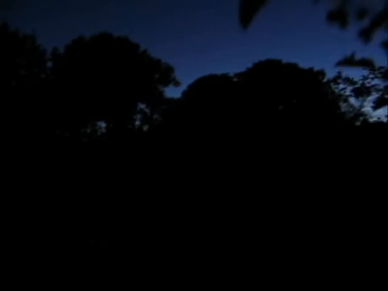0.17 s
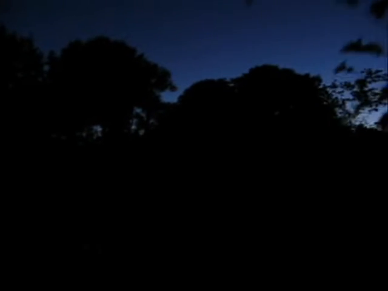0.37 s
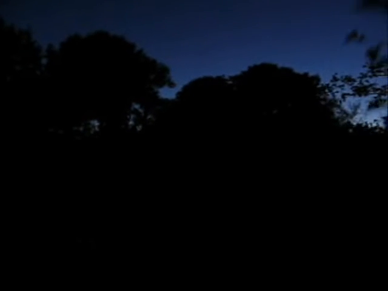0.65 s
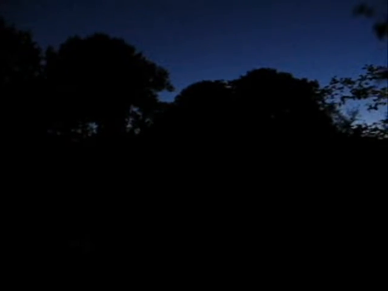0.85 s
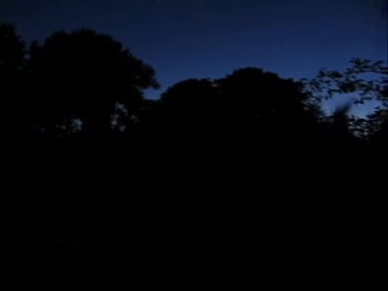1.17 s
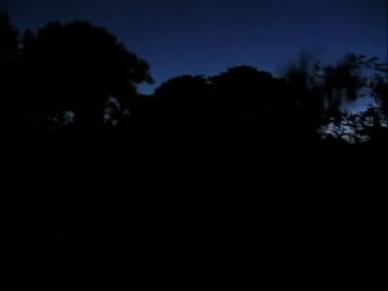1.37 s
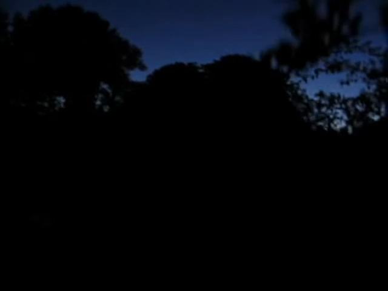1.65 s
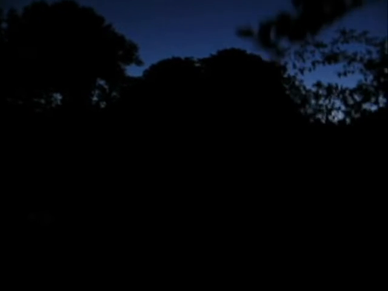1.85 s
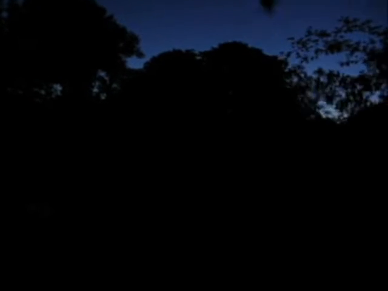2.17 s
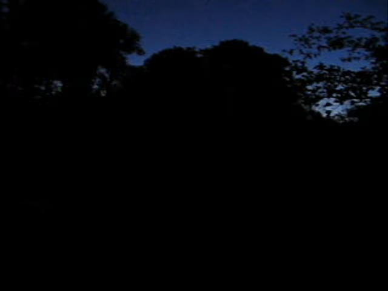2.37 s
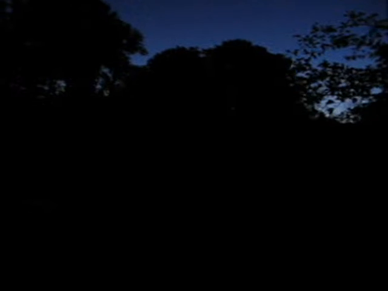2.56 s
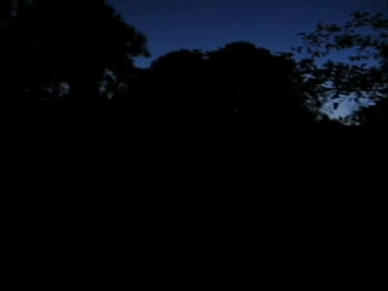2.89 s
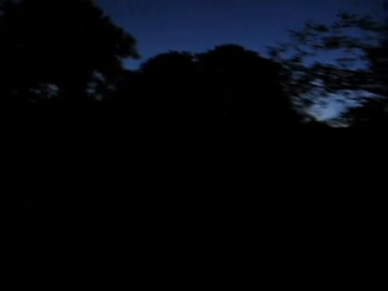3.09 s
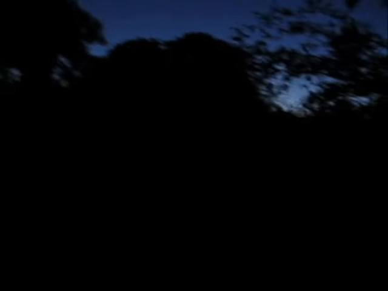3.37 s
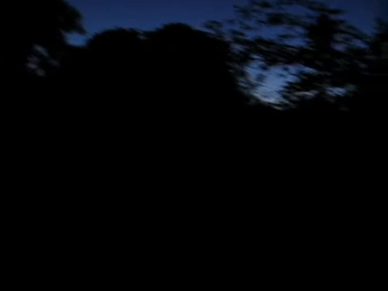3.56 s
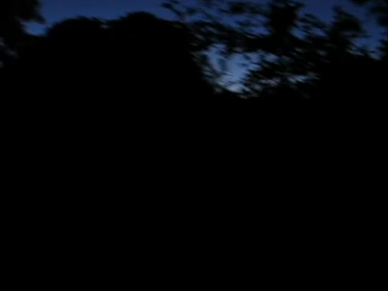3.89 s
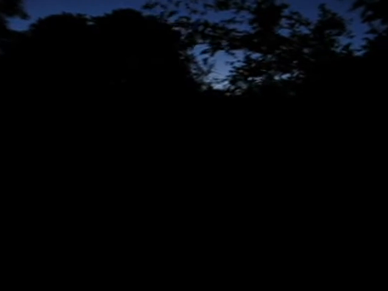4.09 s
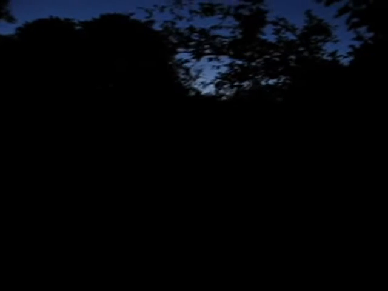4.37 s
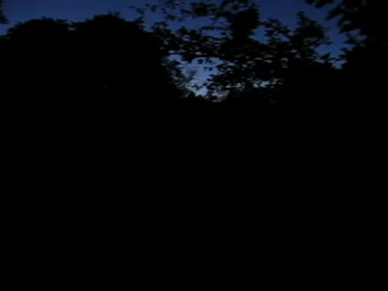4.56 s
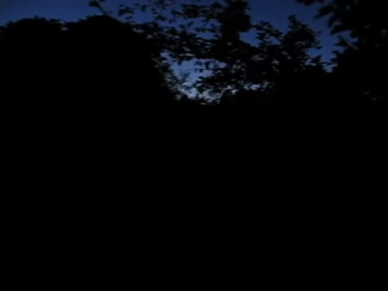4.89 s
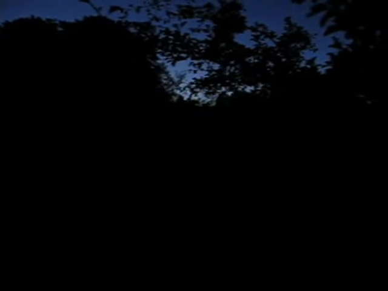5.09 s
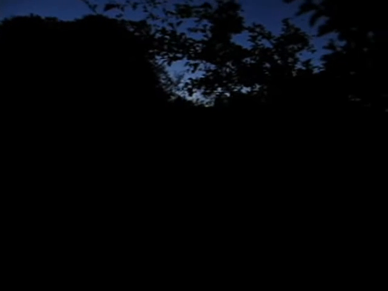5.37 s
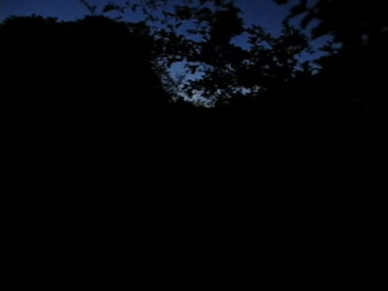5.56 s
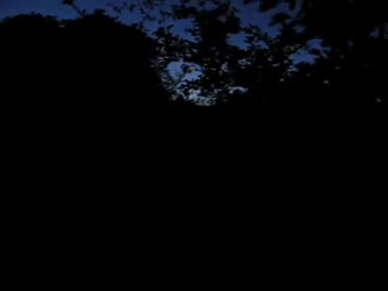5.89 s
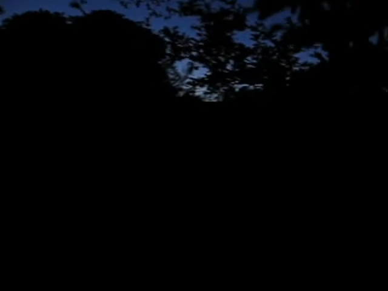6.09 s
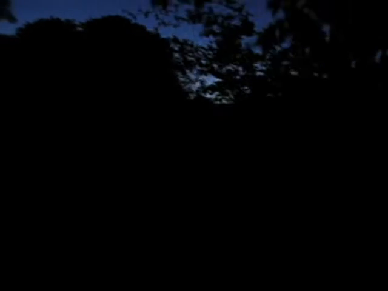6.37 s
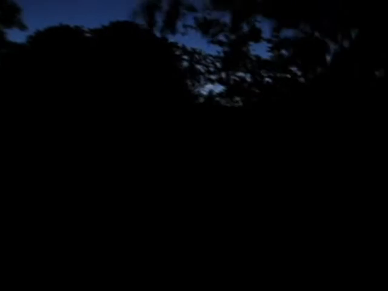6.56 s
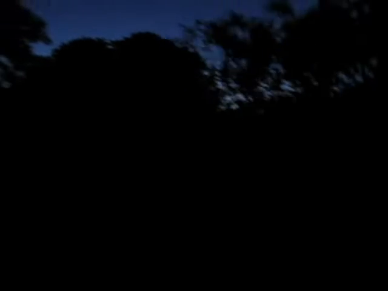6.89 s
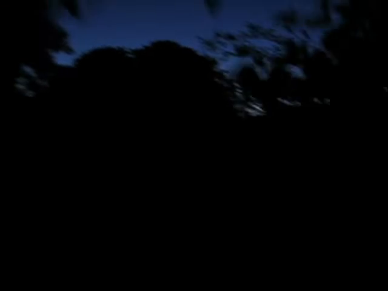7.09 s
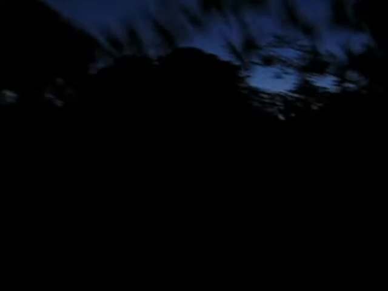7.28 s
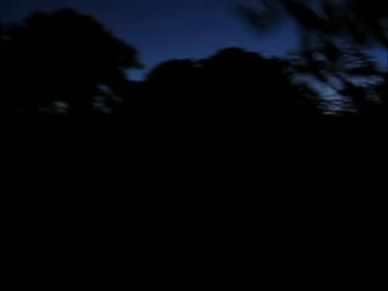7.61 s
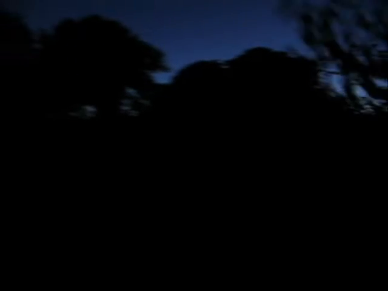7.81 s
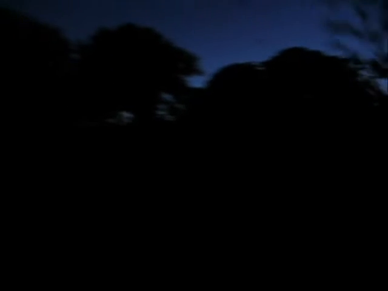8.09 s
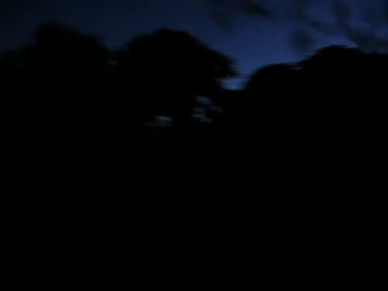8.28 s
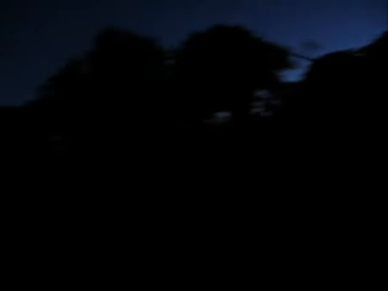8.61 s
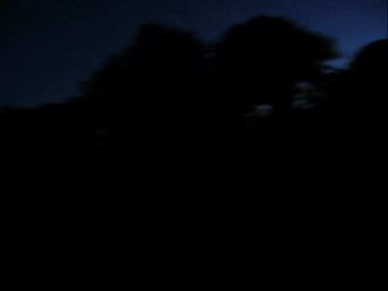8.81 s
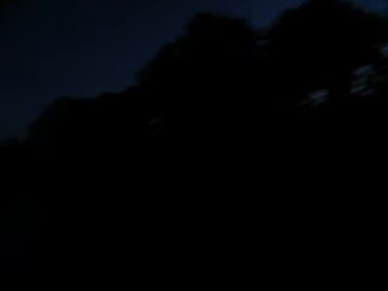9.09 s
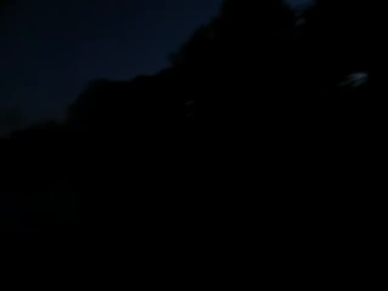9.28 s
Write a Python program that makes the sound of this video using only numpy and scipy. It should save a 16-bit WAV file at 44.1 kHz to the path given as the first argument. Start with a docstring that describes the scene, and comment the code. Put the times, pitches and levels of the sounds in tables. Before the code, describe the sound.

At a dark pond edge with trees, many male tree frogs call at once. Near frogs give short swelling rattles, about ten a second and overlapping, over a continuous throbbing crowd of farther ones. Slight echoes return from water and banks. A small, cheap camera microphone adds hiss, a gritty treble edge, and soft wind rumble with a stronger thump midway. Late on, one lower, louder caller repeats quickly as the crowd thins.

```python
"""A pond at dusk: many male tree frogs rattle together, near callers over a throbbing crowd.
Each call is a short swelling train of pulses; every pulse excites the vocal sac at two main pitches.
Water and banks return short echoes. Wind rumbles and pops on the ports of a small camera microphone,
over hiss and faint whines. Its coarse converter holds each sample, so the chorus is mirrored in the treble."""
import sys
import numpy as np
from scipy import signal
from scipy.fft import rfft, irfft, next_fast_len
from scipy.io import wavfile
from scipy.ndimage import uniform_filter1d, minimum_filter1d

SR = 44100
rng = np.random.default_rng(int(sys.argv[2]) if len(sys.argv) > 2 else 0)


def to_wav(s):
    """Save 16-bit WAV."""
    ch = np.atleast_2d(s).T  # columns
    pcm = np.round(np.clip(ch, -1, 1) * 32767)  # PCM
    wavfile.write(sys.argv[1], SR, pcm.astype(np.int16))


N = 416744


def from_db(db):
    """Logarithmic level: 20 dB is a tenfold amplitude."""
    return 10 ** (np.asarray(db) / 20)


def rms_one(x):
    """Normalisation: the root of the mean power becomes 1."""
    return x / np.sqrt(np.mean(x ** 2) + 1e-20)


def in_time(rows):
    """Linear interpolation: each column after t becomes a curve over all samples."""
    t, *columns = np.transpose(rows)
    return [np.interp(np.arange(N) / SR, t, column) for column in columns]


def coloured(spectrum):
    """Spectral shaping: white noise is weighted in frequency, then scaled to rms 1."""
    size = next_fast_len(N)
    hz, db = np.transpose(spectrum)
    bin_hz = np.arange(1, size // 2 + 2) * SR / size
    shape_db = np.interp(np.log(bin_hz), np.log(hz), db)
    white = rfft(rng.standard_normal(size))
    return rms_one(irfft(white * from_db(shape_db), size)[:N])


PULSES_DRAWN = 14   # most pulses a call can have
SWELL_POINTED = 0.69   # exponent of the swell; under 1 its top is flat
LOWER_SWELL = 0.71   # swell of the lower ring as a share of the upper's, in dB


def pulse_trains(calls, jitter_s, uneven_db):
    """Pulsed excitation: a call swells and fades while its pitch rises and its pulses lengthen.

    Returns, per pulse: t/s, f/Hz, cycles so far, stretch, upper level/dB, lower level/dB."""
    start, length, rate, hz, db, lower_db, late = (column[:, None] for column in calls.T)
    chance = rng.standard_normal((len(calls), 4, PULSES_DRAWN))
    step = np.arange(PULSES_DRAWN)
    along = (step + .7) / (length * rate + 0.198)   # the call ends at 1
    swell = np.sin(np.pi * np.clip(along, 0, 1) ** late).clip(1e-6) ** SWELL_POINTED
    swell_db = 20 * np.log10(swell)
    at = start - .0006 + step / rate + jitter_s * chance[:, 0]
    pitch = hz * (1 + .11 * (along - .6) + .006 * chance[:, 1])
    # the cords keep their beat from pulse to pulse, with a slight slip
    cycles = np.cumsum(pitch * np.diff(at, prepend=0) + 0.095 * chance[:, 3], axis=1)
    stretch = 0.77 + 0.44 * along
    upper_db = db + swell_db + uneven_db * chance[:, 2]
    lower_db = upper_db + lower_db - (1 - LOWER_SWELL) * swell_db
    return [column[along < 1] for column in (at, pitch, cycles, stretch, upper_db, lower_db)]


# Rings of the vocal sac: f as share of the call's upper pitch,
# level/dB added to the pulse level, t/s to the top of the ring before stretching
UPPER_RINGS = [(1, 3.5, 0.0024), (1.3, -11, 0.00082), (1.6, -23, 0.002), (2.1, -19, 0.00042)]
LOWER_RINGS = [(0.445, 3.44, 0.0033)]
RING_SAMPLES = 440


def sac_rings(at, hz, cycles, stretch, db, rings):
    """Damped resonance: each pulse swells softly and dies, as a power of t exp(-t), at each ring pitch."""
    t, waves = np.arange(RING_SAMPLES) / SR, 0
    for share, ring_db, top_s in rings:
        age = t / (top_s * stretch[:, None])
        envelope = (age * np.exp(1 - age)) ** 4.25
        tone = np.sin(2 * np.pi * share * (hz[:, None] * t + cycles[:, None]))
        waves = waves + from_db(db + ring_db)[:, None] * envelope * tone
    # one second of margin takes in pulses that begin before the scene
    where = np.round(at * SR).astype(int)[:, None] + np.arange(RING_SAMPLES) + SR
    return np.bincount(where.ravel(), waves.ravel(), N + 3 * SR)[SR:SR + N]


# The farther frogs: t/s, upper ring level/dB (rms before the throb), mean upper ring f/Hz
CROWD_CURVE = [(0, -22.5, 2332), (.5, -22.5, 2332), (1.4, -22, 2300), (2, -23.5, 2296), (2.6, -20.5, 2301),
               (3.3, -21, 2320), (4.2, -23, 2337), (5, -22.5, 2368), (5.8, -20.5, 2350), (6.6, -22.5, 2347),
               (7.4, -21, 2339), (8.2, -24.5, 2379), (8.8, -28, 2434), (9.45, -27, 2423)]
# A further ring near 1.3 kHz, in the crowd only: f as share of upper pitch, level/dB, t/s to its top
CROWD_MURMUR = [(.56, 2, 0.0033)]
CROWD_CALLS_DRAWN, CROWD_CALLS_PER_S = 1200, 70
CROWD_SPREAD_HZ = 150   # standard deviation of pitch
CROWD_LOWER_DB = -10.5   # lower rings and murmur against the upper


def crowd():
    """Incoherent superposition: farther frogs of all sizes call at random moments."""
    upper_db = in_time(CROWD_CURVE)[0]
    count = CROWD_CALLS_DRAWN
    draw = rng.random((count, 6))
    start = (np.arange(count) + 3 * draw[:, 0]) / CROWD_CALLS_PER_S - .1
    mean_hz = np.interp(start, *np.transpose(CROWD_CURVE)[::2])
    # the sum of two uniform draws, scaled to unit deviation
    hz = mean_hz + CROWD_SPREAD_HZ * (draw[:, 4] + draw[:, 5] - 1) * np.sqrt(6)
    length, rate, db = .05 + .06 * draw[:, 1], 75 + 50 * draw[:, 2], -4 * draw[:, 3]
    calls = np.c_[start, length, rate, hz, db, np.zeros(count), np.full(count, 1.3)]
    *pulses, db, _ = pulse_trains(calls[start < N / SR], jitter_s=.0002, uneven_db=1.63)
    upper = rms_one(sac_rings(*pulses, db, UPPER_RINGS))
    lower = rms_one(sac_rings(*pulses, db, LOWER_RINGS + CROWD_MURMUR))
    return from_db(upper_db) * (upper + from_db(CROWD_LOWER_DB) * lower)


# Nearer calls: t/s of the loudest pulse, pulse rate f/Hz, upper ring f/Hz,
# level/dB at the top of the swell (ring levels are added), lower ring level/dB against the upper
NEAR_CALLS = [(0.012, 113, 2610, -21, -11), (0.083, 113, 2165, -14, -7), (0.148, 137, 2395, -16, -12),
              (0.23, 116, 2575.0, -16, -6), (0.234, 115, 2072, -14.5, -9.5), (0.363, 96, 2403, -14.5, -7),
              (0.38, 173, 2148, -12.5, -8.5), (0.468, 123, 2580, -15.5, -8),
              (0.516, 124, 2060, -13.5, -8.5), (0.579, 110, 2425, -14.5, -12), (0.65, 110, 2097, -10, -8),
              (0.696, 120, 2630, -14.0, -14), (0.799, 116, 2460, -13, -10.5), (0.872, 94, 2272, -17.5, -8),
              (0.929, 130, 2567, -12.9, -16), (0.986, 115, 2456, -14, -16), (1.056, 106, 2433, -11, -10.5),
              (1.118, 100, 2470, -16.5, -10), (1.173, 118, 2558, -12, -12), (1.217, 160, 2350, -13, -31),
              (1.302, 128, 2400.0, -13, -11), (1.422, 122, 2550.0, -10.5, -18),
              (1.547, 142, 2140, -18.2, -15), (1.584, 74, 2500, -20.5, -9), (1.653, 115, 2600, -21, -24),
              (1.712, 125, 2175.0, -21, -15), (1.762, 122, 2487, -19.5, -7.5), (1.841, 86, 2180, -21, -15),
              (1.865, 133, 2460, -12.5, -22), (1.994, 120, 2170, -19, -37),
              (2.032, 110.0, 2570, -18.5, -27), (2.114, 87, 2325.0, -13, -16.5),
              (2.191, 134.0, 2500.0, -26, -22), (2.277, 146.0, 2163, -18, -19),
              (2.331, 117, 2125.0, -19, -22), (2.341, 79.0, 2450, -22, -20), (2.408, 206, 2170, -13.5, -24),
              (2.503, 130, 2440, -16.5, -19), (2.567, 93, 2270, -13.5, -21), (2.686, 106, 2280, -14.5, -16),
              (2.853, 102, 2235, -18.5, -13), (2.906, 59, 2430, -14.5, -19),
              (2.949, 115.6, 2168, -10.5, -15), (3.089, 126, 2190, -22.5, -15), (3.142, 91, 2297, -21, -18),
              (3.203, 74, 2420, -10, -17), (3.292, 156, 2164, -19, -11), (3.41, 110, 2194, -13.5, -19),
              (3.486, 94, 2480, -23.5, -12), (3.558, 81, 2395, -13, -21), (3.636, 140, 2200.0, -31, -15),
              (3.698, 89, 2490, -20.5, -26), (3.724, 135, 2122, -22, -23), (3.859, 79, 2440, -10.5, -23),
              (3.976, 103.0, 2525.0, -15.5, -18), (4.051, 134, 2084, -19, -15),
              (4.061, 75, 2405, -24.5, -8), (4.166, 74, 2362, -10.5, -19), (4.307, 104, 2400, -19.5, -14),
              (4.408, 106, 2350.0, -22, -11), (4.514, 89, 2387, -7.5, -23), (4.597, 117.0, 2095, -28, -9),
              (4.711, 68.0, 2550, -16, -17), (4.758, 127, 2240, -29, -14), (4.845, 73, 2370, -10.3, -25),
              (4.914, 89, 2300, -24, -29), (4.951, 114, 2607, -15, -15.5), (4.955, 70, 2230, -18, -26),
              (5.056, 130, 2397, -14, -16), (5.148, 78, 2407, -9.5, -30), (5.276, 103, 2460, -14, -23),
              (5.372, 133, 2105, -17, -20), (5.427, 81, 2380, -9, -29), (5.515, 108.0, 2275.0, -22.5, -31),
              (5.554, 120, 2270, -18, -20), (5.668, 114, 2540, -15, -17), (5.741, 78.0, 2363, -11.5, -29),
              (5.879, 140, 2380, -15, -24), (5.939, 127, 2400.0, -13, -16), (5.982, 127, 2176, -16.5, -28),
              (6.104, 82.0, 2476, -10, -32), (6.166, 134, 2254, -17.5, -24), (6.179, 130, 2560, -15, -16),
              (6.242, 136, 2236, -28, -23), (6.296, 104, 2430, -12.5, -15), (6.398, 110, 2200, -17.5, -20),
              (6.447, 86, 2493, -10.5, -26), (6.522, 121.0, 2434, -15.5, -28), (6.63, 91, 2140, -17.5, -23),
              (6.746, 74, 2403, -9, -22), (6.841, 120, 2113, -18.5, -22), (6.94, 112.0, 2440, -13.1, -19),
              (7.055, 85, 2190, -12, -25), (7.106, 70, 2485, -10.5, -26), (7.205, 154, 2134, -11.7, -25),
              (7.228, 126, 2470, -13.5, -16), (7.333, 79, 2200, -17.5, -15), (7.364, 77, 2388, -9, -26),
              (7.476, 117, 2150.0, -18, -24), (7.566, 107, 2420, -13, -16), (7.62, 84, 2024, -27, -14),
              (7.687, 120, 2240, -15.5, -19), (7.764, 105, 2370, -9.5, -16), (7.875, 154, 2037, -7.5, -8.5),
              (8.026, 68, 2400.0, -11, -15), (8.096, 150, 2045, -6.5, -11.5),
              (8.199, 104, 2450.0, -14.5, -14), (8.26, 122, 2125.0, -6, -14), (8.384, 80, 2400, -19.5, -13),
              (8.396, 172, 2103, -8, -13.5), (8.524, 140, 2090, -9.5, -12.5), (8.631, 100, 2500, -22, -24),
              (8.648, 158, 2120, -8, -11.5), (8.773, 126, 2110, -9, -10), (8.784, 120, 2460, -17.5, -27),
              (8.856, 120.0, 2460, -19.5, -18), (8.91, 146, 2077, -8.5, -11), (8.984, 98, 2420, -17.5, -16),
              (9.034, 130, 2042, -8.5, -13), (9.145, 120, 2517, -18.5, -8), (9.168, 150, 2070, -10, -14),
              (9.288, 135, 2086, -8.5, -14.5), (9.305, 78, 2500, -16.5, -27.5),
              (9.417, 150, 2100.0, -8.5, -14.5)]
PULSES_PER_CALL, PULSE_RISE_S = 8.4, .0027
# fast callers swell late and stop short; MIDDLE_RATE in pulses per s
SWELL_LATENESS, LATENESS_PER_RATE, MIDDLE_RATE = 1.6, .018, 100


def near_frogs():
    """Pulse repetition: nearer calls share one nominal pulse number, so slow callers call longer."""
    top, rate, hz, db, lower_db = np.transpose(NEAR_CALLS)
    late = np.clip(SWELL_LATENESS + LATENESS_PER_RATE * (rate - MIDDLE_RATE), .5, 4)
    pulses_before_top = np.round(PULSES_PER_CALL * .5 ** (1 / late) - .5)
    start = top - PULSE_RISE_S - pulses_before_top / rate
    calls = np.c_[start, PULSES_PER_CALL / rate, rate, hz, db, lower_db, late]
    *pulses, db, lower_db = pulse_trains(calls, jitter_s=.0001, uneven_db=2.0)
    return sac_rings(*pulses, db, UPPER_RINGS) + sac_rings(*pulses, lower_db, LOWER_RINGS)


# Brief lulls of the crowd: t/s of the middle, level/dB change
LULLS = [(.3, -2), (1.47, -5.5), (1.91, -6.5), (2.41, -3), (3.04, -10.5), (4.105, -20), (4.99, -0.5),
         (2.45, -6), (2.77, -2.5), (6.37, -6), (6.67, -4.5), (7.292, -13), (8.31, -7), (8.46, -8),
         (8.7, -2), (9.21, -1.5)]
LULL_S = 0.012   # standard deviation of the bell-shaped dip
CROWD_FOLLOWS, FOLLOW_S, FOLLOW_FLOOR_DB = 0.19, 0.034, -31   # share in dB, averaging time, level floor


def throb(near):
    """Amplitude modulation: crowd gain in dB follows the near level about its mean, and dips at the lulls."""
    power = uniform_filter1d(near ** 2, size=round(FOLLOW_S * SR))
    level_db = 10 * np.log10(np.maximum(power, 0) + from_db(FOLLOW_FLOOR_DB) ** 2)
    t = np.arange(N) / SR
    lulls_db = sum(db * np.exp(-.5 * ((t - middle) / LULL_S) ** 2) for middle, db in LULLS)
    return CROWD_FOLLOWS * (level_db - level_db.mean()) + lulls_db


# Gain of the chorus' rasp above RASP_HZ: t/s, level/dB
RASP_CURVE = [(0, 2), (1.5, 0), (3, -0.5), (5, -2.5), (7, -3.5), (8, -2), (8.6, -7), (9.45, -4.5)]
RASP_HZ = 3000


def rasp(chorus):
    """Band splitting: the treble of the chorus takes a slowly varying gain while its body stays."""
    body = signal.sosfiltfilt(signal.butter(3, RASP_HZ, fs=SR, output="sos"), chorus)
    return body + from_db(in_time(RASP_CURVE)[0]) * (chorus - body)


# Echoes from water and banks: t/s delay, level/dB against the direct sound
ECHOES = [(.0043, -22), (.011, -12.5), (.023, -18), (.047, -42)]


def pond(x):
    """Discrete reflection: a few delayed, weaker copies join the direct sound."""
    out = x.copy()
    for delay_s, db in ECHOES:
        delay = round(delay_s * SR)
        out += from_db(db) * np.r_[np.zeros(delay), x[:N - delay]]
    return out


# Wind on the ports: t/s, level/dB rms
WIND_CURVE = [(0.0, -49), (0.66, -50), (1.13, -42.5), (1.55, -51), (2.11, -47), (3.21, -43), (3.81, -38),
              (4.11, -43.5), (4.47, -31.5), (4.76, -40.5), (5.34, -43.5), (6.48, -47.5), (7.34, -39.5),
              (7.9, -48), (8.2, -39), (8.4, -58), (8.7, -42), (9.05, -47), (9.45, -58)]
# Spectrum of the wind: f/Hz, relative level/dB per Hz
WIND_COLOUR = [(15, -32), (30, 2), (55, 4.5), (110, -7.5), (220, -21), (500, -29)]


def wind_rumble():
    """Turbulent pressure: low-frequency noise on the ports rises and falls with the wind."""
    return from_db(in_time(WIND_CURVE)[0]) * coloured(WIND_COLOUR)


# Spectrum of evening air and preamp: f/Hz, relative level/dB per Hz
HISS_COLOUR = [(200, -9), (500, -11), (1500, 0), (4000, -17.5), (5500, -20), (8000, -12)]
HISS_DB = -37   # rms


def hiss():
    """Stationary noise: evening air and preamp give a steady coloured hiss."""
    return from_db(HISS_DB) * coloured(HISS_COLOUR)


# Faint tones of the camera: f/Hz, level/dB rms
WHINES = [(334, -63.5), (658, -64.5), (4620, -61.5)]


def camera_whines():
    """Pure tones: steady sinusoids, whose peak is root two times their rms."""
    t = np.arange(N) / SR
    return sum(np.sqrt(2) * from_db(db) * np.sin(2 * np.pi * hz * t) for hz, db in WHINES)


# Pops of wind pressure on the ports: t/s of the dip, peak level/dB, f/Hz
POPS = [(3.283, -22, 800), (3.529, -28, 89), (3.563, -26, 87.6), (4.061, -28, 127), (4.238, -30, 80),
        (4.351, -28, 80.5), (4.396, -60, 132), (4.441, -61, 91), (4.46, -15.5, 145), (4.477, -19, 223),
        (4.489, -35, 145), (4.5, -19, 109), (4.522, -24, 130), (4.594, -30, 100), (4.637, -30, 79.8),
        (4.999, -31, 330), (6.864, -32, 92), (7.213, -27, 113), (7.235, -26, 118), (7.27, -29, 90),
        (7.324, -26, 80), (7.337, -25, 103), (7.366, -27, 91), (7.807, -32, 127), (7.892, -31.5, 102),
        (8.122, -31, 138), (8.202, -22, 169), (8.214, -21, 112)]


def wind_pops():
    """Pressure transient: each pop is one quick dip of pressure between two small swells."""
    out = np.zeros(N)
    for middle_s, db, hz in POPS:
        u = np.pi * hz * np.arange(-800, 800) / SR
        start = round(middle_s * SR) - 800
        out[start:start + 1600] -= from_db(db) * (1 - 2 * u ** 2) * np.exp(-u ** 2)
    return out


def scene():
    """Linear superposition: frogs with their echoes add to wind, hiss and whines."""
    near = near_frogs()
    chorus = rasp(near + from_db(throb(near)) * crowd())
    frogs = signal.sosfilt(signal.butter(6, 740, "highpass", fs=SR, output="sos"), chorus)
    camera_floor = wind_rumble() + hiss() + camera_whines() + wind_pops()
    return (pond(frogs) + camera_floor)[None]


CEILING = 0.6   # limiter threshold, amplitude


def limiter(x):
    """Gain control: gain falls just ahead of a loud pulse and returns within a few milliseconds."""
    room = np.minimum(1, CEILING / (np.abs(x) + 1e-9))
    return x * uniform_filter1d(minimum_filter1d(room, size=131), size=131)


HOLD = 4   # samples held per converter step
OFFSET = .0919   # constant added by the converter, amplitude
ANTI_ALIAS_HZ, CUTOFF_HZ = 6100, 15760


def record(dry):
    """Sample and hold: a limited, gently low-passed signal at a quarter rate gains images about that rate."""
    smooth = signal.sosfilt(signal.butter(2, ANTI_ALIAS_HZ, fs=SR, output="sos"), limiter(dry))
    held = np.repeat(smooth[:, ::HOLD], HOLD, axis=1)[:, :N] + OFFSET
    # steep top cut: 0.1 dB ripple, 70 dB rejection
    return signal.sosfilt(signal.ellip(12, .1, 70, CUTOFF_HZ, fs=SR, output="sos"), held)


dry = scene()
out = record(dry)
to_wav(out)
```